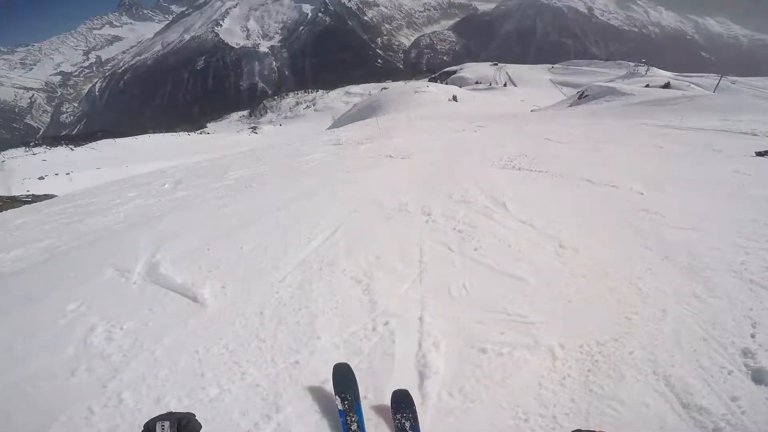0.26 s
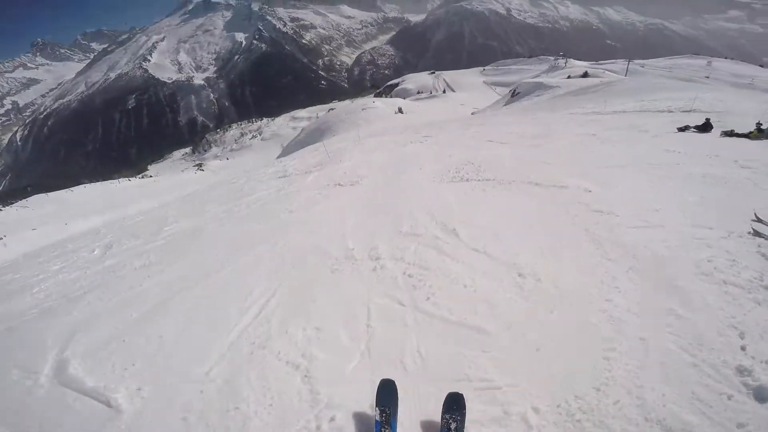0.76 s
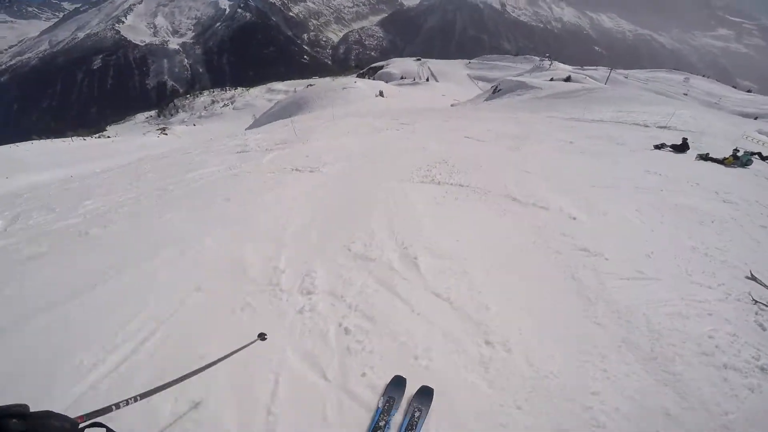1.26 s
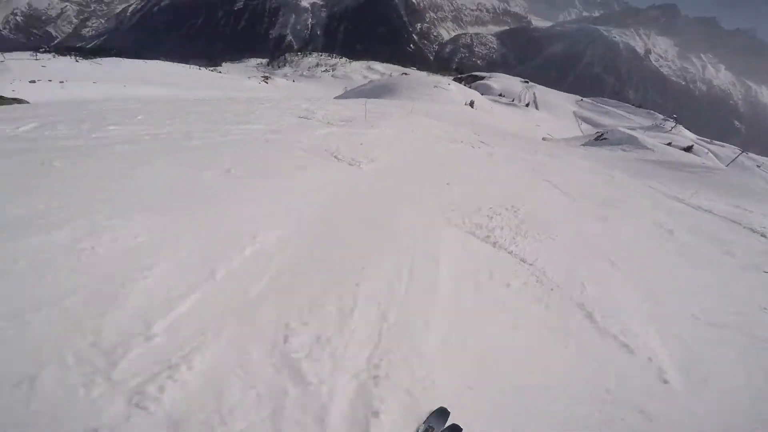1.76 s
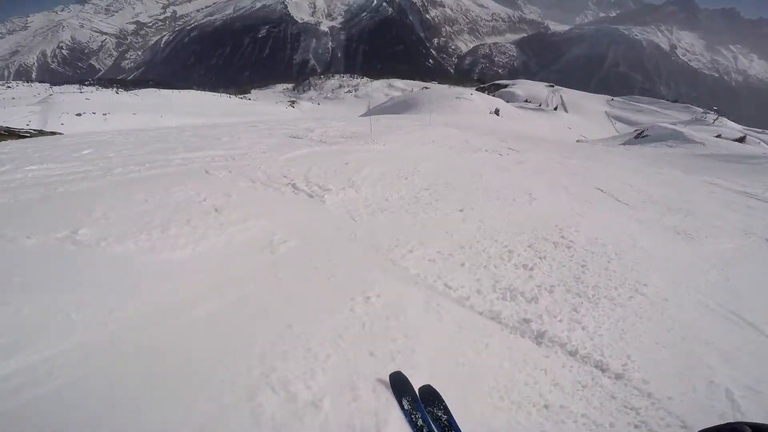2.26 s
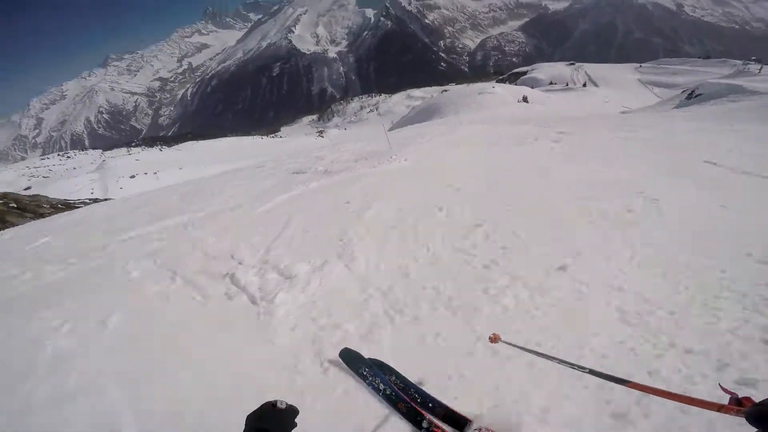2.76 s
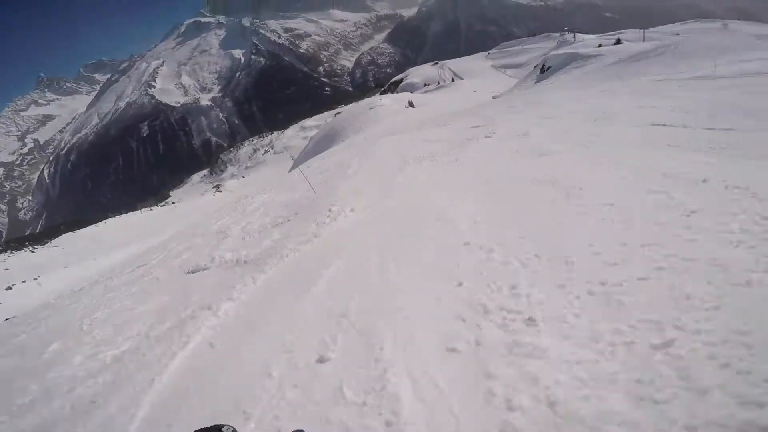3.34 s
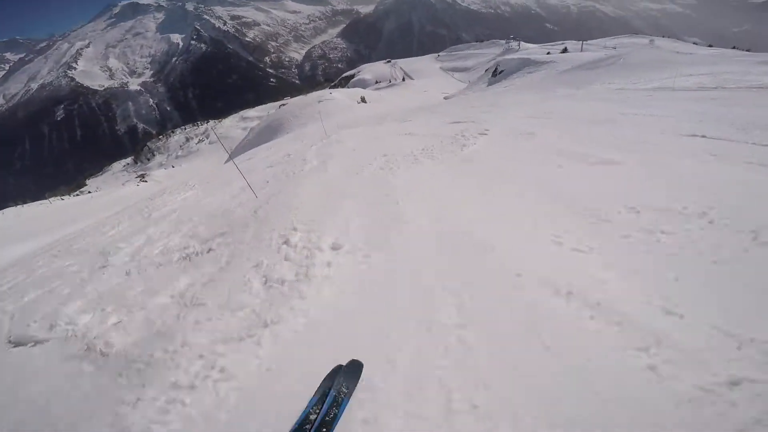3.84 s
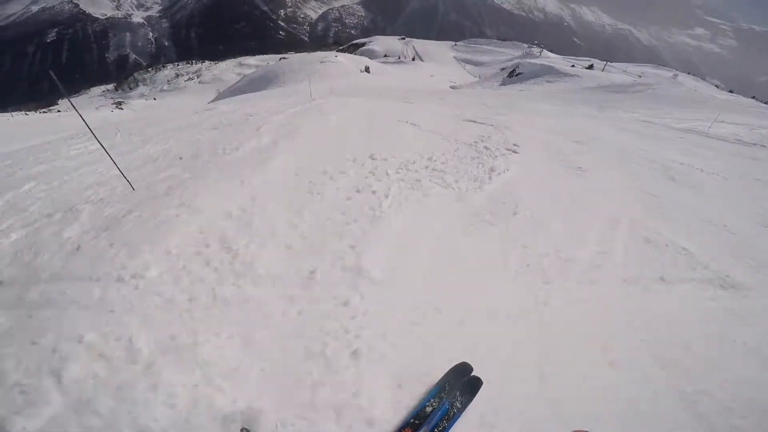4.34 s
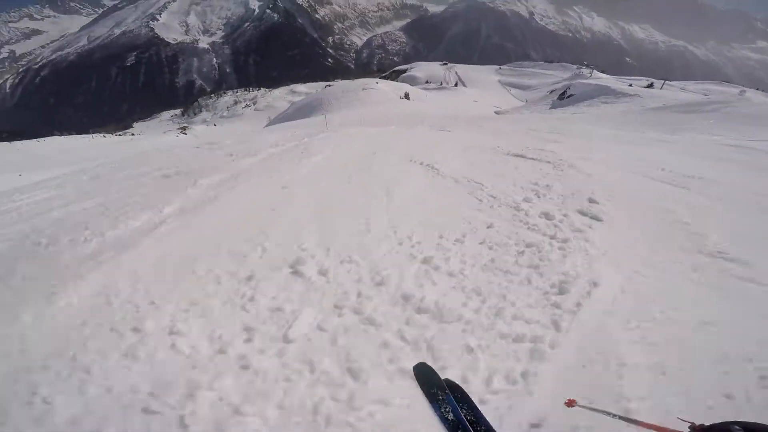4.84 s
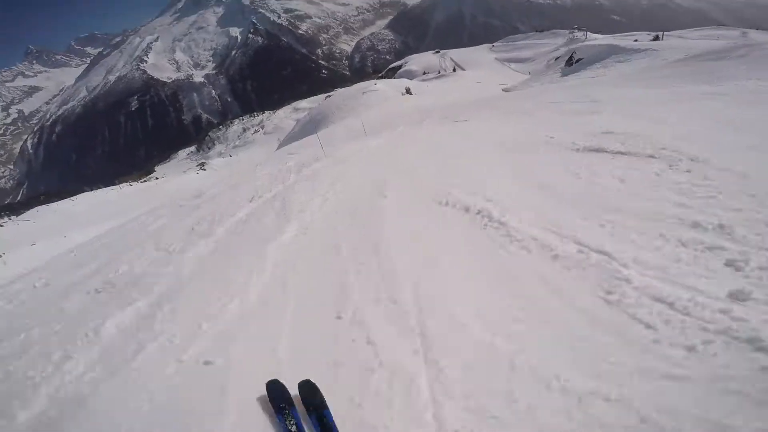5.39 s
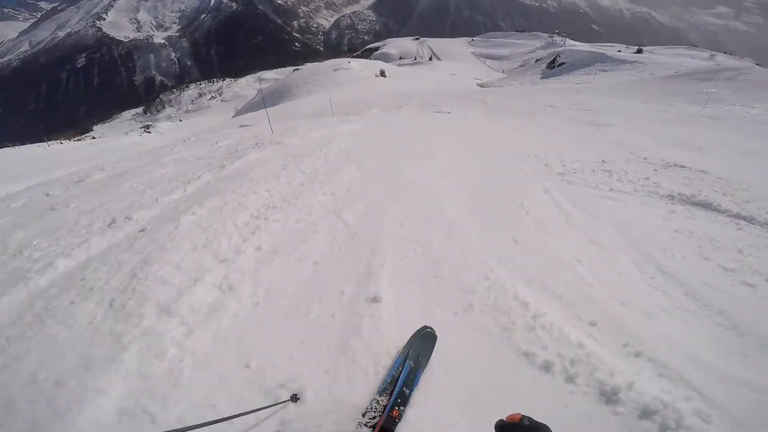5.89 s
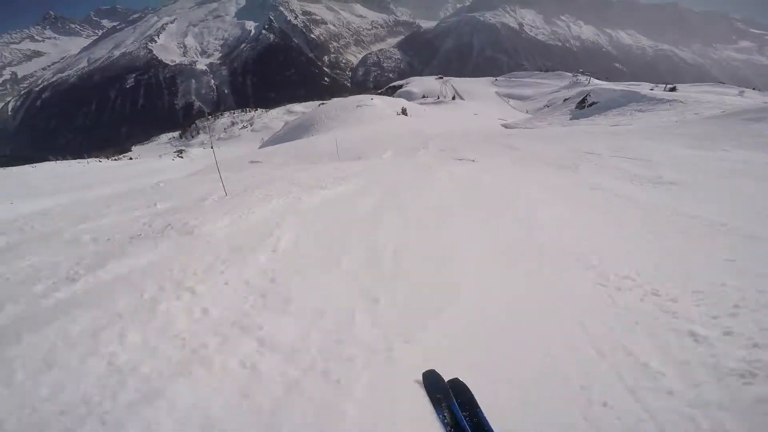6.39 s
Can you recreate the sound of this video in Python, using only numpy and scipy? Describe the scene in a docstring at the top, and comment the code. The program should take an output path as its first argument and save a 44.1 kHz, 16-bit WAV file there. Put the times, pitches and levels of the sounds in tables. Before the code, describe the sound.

From a skier's own position on an open mountain slope, a quiet glide gives way to bright, grainy hisses as the edges bite firm snow. Each turn swells, peaks and falls away, with crunching crust and low grinding. Dull boot knocks, hard little rattles and faint hollow creaks punctuate it, while wind flaps deeply against the casing. The enclosed microphone makes everything close, slightly hollow and plasticky.

```python
"""Skis hiss and crunch through linked turns in firm snow, boots creak and knock, bindings tick, wind buffets.
All is heard by a camera shut in a plastic housing. Snow is grainy noise whose level follows the bite of the edges.
Knocks are short damped pushes, ticks noise bursts, creaks resonated slips, and wind a low flap with turbulence.
Snow, knocks and ticks pass through the resonances of the housing."""
import sys
import numpy as np
from scipy import signal
from scipy.fft import rfft, irfft, next_fast_len
from scipy.io import wavfile
from scipy.ndimage import uniform_filter1d

SR = 44100
rng = np.random.default_rng(int(sys.argv[2]) if len(sys.argv) > 2 else 0)


def persist_wave(psi):
    """Save psi, clipped to +-1, as 16-bit WAV."""
    counts = np.round(np.clip(psi, -1, 1) * 32767).astype(np.int16)
    wavfile.write(sys.argv[1], SR, np.atleast_2d(counts).T)


N = 291942

# snow condition along the run, as offsets: [t/s, crust/dB, looseness/dB, coarse powder/dB]
SNOW = [(0.06, 2.5, -9.5, 0), (1.3, 3.5, -1, -2), (2.0, 1, -2, -14), (2.5, -0.5, 1.5, -14),
        (2.72, 2.5, -4.5, 2), (3.4, -7.5, 0.5, -0.5), (3.8, 4, 1, -2), (4.0, 3.5, 1.5, -7),
        (4.5, -2.5, 4, -15), (4.9, 3.5, -2, -2), (5.15, 0, 0.5, 1), (5.65, 4, -3, -5), (6.05, 0, 1, -12),
        (6.62, 2.5, -1.5, 1)]
# short scuffs over lumps of crust: [centre t/s, length/s, crunch level/dB, grind level/dB]
SCUFFS = [(0.1, 0.24, -51, -61), (0.6, 0.1, -56, -62), (1.15, 0.034, -48, -60), (1.76, .08, -39.5, -48),
          (2.65, 0.062, -52, -54.5), (2.82, 0.26, -60, -54), (3.57, 0.067, -59, -65),
          (3.74, 0.086, -49, -52.5), (3.9, 0.12, -51, -49), (4.5, 0.16, -47, -54), (4.7, 0.12, -47, -50),
          (4.86, 0.099, -55, -56), (5.08, 0.16, -44.5, -51.5), (5.15, 0.048, -33, -50.5),
          (5.73, 0.17, -62, -55), (5.95, .08, -37.5, -61), (6.35, 0.22, -41.5, -48.5),
          (6.45, 0.13, -44, -50), (6.62, 0.17, -50, -49)]


def amp(db):
    """Amplitude factor of a level in dB."""
    return 10 ** (np.asarray(db) / 20)


def evened(x):
    """Scales x to rms 1."""
    return x / np.sqrt(np.mean(x ** 2) + 1e-20)


def read(points, hz):
    """Reads a spectrum at hz, interpolating dB along log frequency."""
    f, value = np.transpose(points)
    return np.interp(np.log(hz + 1), np.log(f + 1), value)


def column(table, index):
    """One control of a table, sample by sample."""
    rows = np.array(table)
    return np.interp(np.arange(N) / SR, rows[:, 0], rows[:, index])


def colour(x, spectrum):
    """Filters x by a spectrum."""
    size = next_fast_len(len(x))
    gain = amp(read(spectrum, np.fft.rfftfreq(size, 1 / SR)))
    return irfft(rfft(x, size) * gain, size)[:len(x)]


def wander(per_s):
    """Smooth random control of rms 1 that changes about per_s times a second."""
    span = max(int(SR / per_s / 2), 1)
    once = uniform_filter1d(rng.standard_normal(N), span)
    return evened(uniform_filter1d(once, span))


def resonate(x, hz, width_hz):
    """Resonance of gain 1: shifts hz (fixed or a curve) down to zero, smooths, shifts back."""
    turn = np.exp(2j * np.pi * np.cumsum(hz * np.ones(len(x))) / SR)
    r = np.exp(-np.pi * width_hz / SR)
    return 2 * (turn * signal.lfilter([1 - r], [1, -r], x / turn)).real


def lagging(db, seconds):
    """A level that follows db late, settling with this time constant."""
    r = np.exp(-1 / (seconds * SR))
    return db[0] + signal.lfilter([1 - r], [1, -r], db - db[0])


def swells(events, index):
    """Summed power of smooth rises and falls, one per row: [centre t/s, length/s, level/dB ...]."""
    t = np.arange(N) / SR
    power = np.zeros(N)
    for row in events:
        shape = np.cos(np.pi * np.clip((t - row[0]) / row[1], -.5, .5)) ** 2
        power += (amp(row[index]) * shape) ** 2
    return power


def patchy(x, patch_db, patch_bins, patch_frames):
    """Bright and dull patches drift over time and pitch."""
    z = signal.stft(x, nperseg=256)[2]
    patches = uniform_filter1d(rng.standard_normal(z.shape), max(round(patch_bins), 1), axis=0)
    patches = evened(uniform_filter1d(patches, max(round(patch_frames), 1), axis=1))
    return signal.istft(z * amp(patch_db * patches), nperseg=256)[1][:N]


def friction(spectrum, grains_per_s, spread_db, grain_share, flicker_db, flicker_per_s):
    """Dense hiss of crystals plus separate cracking grains, with a random flicker of level."""
    struck = rng.random(N) < grains_per_s / SR
    size = amp(spread_db * np.minimum(rng.exponential(1, N), 5)) * struck
    grains = evened(size * rng.choice([-1., 1.], N))
    share = np.clip(grain_share, 0, 1)
    rub = np.sqrt(share) * grains + np.sqrt(1 - share) * rng.standard_normal(N)
    return colour(rub * amp(flicker_db * wander(flicker_per_s)), spectrum)


def heard(x, shell, lo_hz, hi_hz):
    """A sound inside the shell, at rms 1 in the band lo_hz to hi_hz."""
    x = signal.oaconvolve(x, shell)[:N]
    hz, power = signal.welch(x, SR, nperseg=1024)
    band = (hz > lo_hz) & (hz < hi_hz)
    return x / np.sqrt(power[band].sum() * hz[1])


def skis(shell, air):
    """Four sizes of snow sound follow edge pressure; all but the grind share a chatter. The mount shakes too."""
    chatter = wander(45)
    spray_db = edges_db()
    press_db = spray_db + 45  # above the reference spray level of -45 dB
    snow = spray(shell, chatter, spray_db) + crunch(shell, chatter, press_db)
    snow += grind(shell, press_db) + powder(shell, chatter, press_db)
    return snow + mount_shake(press_db, air)


def edges_db():
    """Spray level: the flat glide plus every bite, which takes hold, builds, holds and lets go."""
    # spray of skis running flat: [t/s, level/dB]
    glide = [(0.06, -62), (0.21, -70), (0.53, -67.5), (0.62, -62.5), (1.44, -61), (1.52, -54.5), (2.4, -52),
             (2.6, -55.5), (2.72, -58.5), (2.8, -54), (3.63, -47.5), (3.98, -57.5), (5.45, -55),
             (5.65, -58.5), (6.3, -60), (6.62, -51.5)]
    # edge bites: [set t/s, peak t/s, held/s, spray level/dB, rise/(dB/s), fall/(dB/s)]
    bites = [(0.783, 0.802, 0.012, -60, 100., 131), (1.097, 1.124, 0.018, -60, 100., 100.),
             (1.446, 1.972, 0.014, -34, 43, 123), (2.044, 2.178, 0.033, -37.5, 79, 144),
             (3.1, 3.405, .17, -42, 78, 198), (3.99, 4.388, 0.025, -43, 29.5, 33),
             (4.94, 5.172, 0.038, -40.5, 71, 94), (5.67, 5.938, 0.027, -38, 75, 98),
             (5.988, 6.091, .03, -38, 105, 84)]
    set_s = 0.049  # ramp of the edge taking hold
    t = np.arange(N) / SR
    power = amp(column(glide, index=1)) ** 2
    for start_s, peak_s, held_s, db, rise, fall in bites:
        grip = np.clip((t - start_s) / set_s, 0, 1)
        build_db = rise * np.maximum(peak_s - t, 0)
        release_db = fall * np.maximum(t - peak_s - held_s, 0)
        power = power + (grip * amp(db - build_db - release_db)) ** 2
    return 10 * np.log10(power)


def spray(shell, chatter, spray_db):
    """Snow sprays off the edges: bright, dense grain noise."""
    # colour of spray: [f/Hz, gain/dB]
    spectrum = [(300, -24), (1000, -4.5), (3000, -2.5), (5000, 0), (7500, 2), (10000, -15.5), (15000, -15)]
    rub = friction(spectrum, grains_per_s=1500., spread_db=2.7, grain_share=0.22,
                   flicker_db=0.067, flicker_per_s=77.0)
    rub = patchy(rub, patch_db=1.0, patch_bins=4., patch_frames=12.) * amp(0.98 * chatter)
    return heard(rub, shell, 3600, 7500) * amp(spray_db)


def crunch(shell, chatter, press_db):
    """Crust breaks under the edges and in scuffs: sparser mid-pitched grains."""
    # colour of breaking crust: [f/Hz, gain/dB]
    spectrum = [(300, -60), (900, -7.5), (1500, 4.5), (2600, 5), (4000, -15.5), (8000, -73), (15000, -37)]
    rub = friction(spectrum, grains_per_s=700., spread_db=2.6, grain_share=0.19,
                   flicker_db=0.26, flicker_per_s=55.0)
    rub = patchy(rub, patch_db=1.7, patch_bins=3., patch_frames=5.) * amp(1.3 * chatter)
    pressed_db = -46. + 1.1 * press_db + column(SNOW, index=1)
    level = np.sqrt(amp(pressed_db) ** 2 + swells(SCUFFS, index=2))
    return heard(rub, shell, 1250, 3000) * level


def grind(shell, press_db):
    """Low, patchy grinding under the edges and in scuffs."""
    # colour of grinding: [f/Hz, gain/dB]
    spectrum = [(60, 7), (150, -6.5), (400, 0.5), (800, -1.5), (1300, -4), (3000, -13)]
    rub = friction(spectrum, grains_per_s=300., spread_db=1.7, grain_share=0.15,
                   flicker_db=2.73, flicker_per_s=31.0)
    rub = patchy(rub, patch_db=3.4, patch_bins=1.5, patch_frames=8.)
    pressed_db = -56. + 0.68 * press_db
    level = np.sqrt(amp(pressed_db) ** 2 + swells(SCUFFS, index=3))
    return heard(rub, shell, 200, 900) * level


def powder(shell, chatter, press_db):
    """Fine hiss of powder that hangs in the air, so its level lags the pressure; a coarser band varies."""
    # colour of fine powder: [f/Hz, gain/dB]
    fine = [(4000, -25), (8000, -5), (11800, -9.5), (12800, -3), (15000, 1.5)]
    # band of coarse powder: [f/Hz, gain/dB]
    coarse = [(8000, -40), (9300, 2.5), (11300, 5.5), (12300, -35)]
    hang_s = 0.044
    rub = friction(fine, grains_per_s=4000., spread_db=5.7, grain_share=0.2,
                   flicker_db=0.52, flicker_per_s=40.) * amp(0.43 * chatter)
    level_db = -57. + 0.7 * lagging(press_db, hang_s) + column(SNOW, index=2)
    hiss = heard(rub, shell, 11500, 15000) * amp(level_db)
    return hiss + colour(hiss, coarse) * amp(column(SNOW, index=3))


def mount_shake(press_db, air):
    """Edge pressure and gusts shake the mount: unsteady low rumble, not passed through the shell."""
    # colour of the shake: [f/Hz, gain/dB]
    spectrum = [(25, -23), (50, 7.5), (80, -7), (150, -20.5), (300, -34), (800, -43)]
    shake = evened(colour(rng.standard_normal(N) * amp(2.5 * wander(14)), spectrum))
    return shake * amp(-39.5 + 0.47 * press_db) * air ** 0.33


def add(out, s, db, sound, shell):
    """Adds one event rung through the shell, with peak level db, starting at s."""
    rung = signal.fftconvolve(sound, shell)
    part = out[round(s * SR):][:len(rung)]
    part += amp(db) * rung[:len(part)] / abs(rung).max()


def knocks(shell):
    """Dull blows: each is a push of a few cycles with a crumbly tail."""
    # blows: [t/s, peak level/dB, centre f/Hz, length/cycles]
    blows = [(.424, -48, 1840, 4.3), (.535, -48, 1090, 4.7), (.582, -38, 1520, 1.5),
             (1.091, -30.5, 1430, 4), (1.149, -28, 1530, 6.5), (1.2, -39.5, 1580, 5.1),
             (1.353, -36, 1030, 1.7), (1.503, -30, 1920, 8.5), (2.625, -38, 576, 2.1),
             (2.643, -33, 1300, 3.3), (2.649, -29, 536, 1.4), (2.795, -44, 455, 6), (2.834, -35, 1950, 5.6),
             (3.821, -35, 1960, 5.4), (3.886, -39, 630, 5.2), (3.907, -35.5, 840, 5),
             (4.139, -27, 1090, 2.3), (4.459, -34, 260, 1.3), (4.689, -26, 1920, 0.99),
             (4.875, -35, 620, 2.4), (4.882, -23, 1120, 2.1), (5.3, -31, 1560, 1.9),
             (5.354, -36, 1180, 3.3), (5.406, -28.5, 1850, 1.3), (5.476, -37, 1500, 3.3),
             (5.506, -35, 1900, 6), (5.712, -22.5, 1510, 1.5), (6.298, -26, 1700, 0.94),
             (6.342, -33, 1850, 6.2), (6.355, -26.5, 1600, 3.8), (6.357, -29.5, 660, 3.6),
             (6.369, -22, 1650, 1.5), (6.427, -22.5, 630, 3.3), (6.44, -26, 1840, 2.6),
             (6.474, -27, 564, 3.3)]
    out, t = np.zeros(N), np.arange(1500) / SR
    for (s, db, hz, cycles), grit in zip(blows, rng.standard_normal((len(blows), len(t)))):
        u = t * hz / max(cycles, .5) * 4  # the push peaks at u = 1
        push = u * np.exp(1 - u) * np.sin(2 * np.pi * hz * t)
        tail = evened(resonate(grit, hz, hz / 2)) * amp(-14.0 - t * 1600.0) * np.minimum(u, 1)
        add(out, s, db, push + tail, shell)
    return out


def ticks(shell):
    """Hard parts rattle: a sharp burst of noise round a centre pitch."""
    # rattles: [t/s, peak level/dB, centre f/Hz]
    rattles = [(0.651, -41, 3230), (0.821, -35, 4300), (1.1474, -32, 2700), (1.1707, -36, 3280),
               (1.504, -26.5, 3100), (2.6443, -29, 3300), (2.834, -32, 3200), (3.0125, -31, 4200),
               (3.574, -21, 4250), (3.8195, -26, 3020), (4.136, -29, 5630), (4.691, -36, 3060),
               (5.3537, -24, 2700), (5.3767, -37, 5520), (5.4038, -30.5, 3120), (5.473, -34, 2630),
               (5.5068, -31.5, 2520), (6.2973, -26, 2610), (6.3679, -33, 2720)]
    t60_s = 0.03
    out, t = np.zeros(N), np.arange(1500) / SR
    snap = 1 + 3.1 * np.exp(-t / 0.00046)  # crisp onset
    decay = np.exp(-np.log(1000) * t / t60_s)
    for (s, db, hz), grit in zip(rattles, rng.standard_normal((len(rattles), len(t)))):
        core = resonate(resonate(grit, hz, 1500.0), hz, 1500.0)
        burst = core + 0.36 * resonate(grit, hz, 4700.0)
        add(out, s, db, burst * snap * decay, shell)
    return out


def creaks():
    """Uneven slips in a flexing boot ring a hollow, gliding note and, weaker, its third partial."""
    # creaks: [start t/s, length/s, initial note level/dB, first f/Hz, last f/Hz]
    flexes = [(1.919, .11, -44, 600, 620), (2.128, 0.16, -52, 594, 560), (2.773, 0.074, -52.5, 634, 634),
              (4.703, 0.096, -50, 664, 625), (4.799, 0.082, -48.5, 610, 614), (5.044, .06, -50, 700, 694),
              (6.436, .085, -46, 644, 610)]
    fade_db = -4  # change over each creak
    out = np.zeros(N)
    for s, length_s, db, first_hz, last_hz in flexes:
        u = np.arange(0, 1, 1 / (length_s * SR))
        hz = first_hz + (last_hz - first_hz) * u
        slips = rng.standard_normal((2, SR // 4))[:, :len(u)]
        note = evened(resonate(resonate(slips[0], hz, 120.0), hz, 120.0))
        third = evened(resonate(resonate(slips[1], 3 * hz, 190.0), 3 * hz, 190.0))
        level = amp(db + fade_db * u) * signal.windows.tukey(len(u), .3)
        at = round(s * SR)
        out[at:at + len(u)] += level * (note + amp(-1.5) * third)
    return out


def housing():
    """Causal (minimum-phase) response of the shell: resonances over what leaks through the wall."""
    # wall leakage: [f/Hz, gain/dB]
    leakage = [(100, -2), (400, -9.5), (1300, -11), (3000, -7.5), (6500, -11.5), (8000, -18), (15000, -24)]
    # shell resonances: [f/Hz, width/Hz, gain/dB]
    modes = [(620, 190, -7.5), (990, 340, -7.5), (1512, 505, -4.5), (1798, 340, -3.5), (2414, 100, -7.5),
             (2657, 186, -1.5), (3127, 240, -3), (3540, 310, -9.5), (4063, 390, -2), (4380, 106, -1.5),
             (4713, 96, -3), (5523, 480, -4), (6614, 460, -7.5), (8616, 326, -3.5), (10100, 390, -19),
             (11950, 940, -15), (12970, 1120, -14)]
    # cancellation between neighbouring modes: [f/Hz, width/Hz, gain/dB]
    dips = [(2090, 210, -4), (2904, 190, -3.5), (3660, 90, -3.5), (8600, 415, -16.5)]
    hz = abs(np.fft.fftfreq(8192, 1 / SR))
    power = amp(read(leakage, hz)) ** 2
    for f, width, db in modes:
        power = power + amp(db) ** 2 / (1 + (2 * (hz - f) / width) ** 2) ** 2
    for f, width, db in dips:
        power = power * amp(db / (1 + (2 * (hz - f) / width) ** 2)) ** 2
    log_response = np.conj(signal.hilbert(np.log(power) / 2))
    return np.fft.ifft(np.exp(log_response)).real[:2048]


def airstream():
    """Strength of the wind: a wavering stream with single gusts on top."""
    # stream strength: [t/s, level/dB]
    stream_points = [(0.06, -28.5), (0.5, -39), (0.85, -23.5), (1.08, -29), (1.43, -36), (1.66, -19.5),
                     (2.32, -19.5), (2.63, -33.5), (2.72, -26), (3.12, -18), (3.24, -33), (3.87, -30),
                     (4.05, -25.5), (4.75, -28), (5.0, -24), (5.13, -27), (5.8, -31), (6.1, -24),
                     (6.44, -33.5), (6.62, -39)]
    # gusts that slap the shell: [peak t/s, length/s, level/dB]
    buffets = [(0.03, 0.18, -12), (0.67, 0.18, -20), (1.17, 0.13, -20.5), (1.32, 0.25, -21.5),
               (1.55, 0.16, -16), (2.85, 0.088, -9.5), (3.4, 0.33, -19.5), (3.6, .08, -22),
               (3.77, 0.16, -18), (4.4, 0.069, -16), (5.34, 0.21, -16.5), (5.62, 0.34, -29),
               (6.2, 0.083, -9), (6.57, 0.15, -21.5)]
    stream = amp(column(stream_points, index=1) + 4 * wander(7.2))
    return np.sqrt(stream ** 2 + swells(buffets, index=2))


def wind(air):
    """Eddies flap the shell at an unsteady low rate, over a lumpy turbulent skirt."""
    # colour of turbulence: [f/Hz, gain/dB]
    spectrum = [(15, -1), (25, 12), (40, -10), (60, -18.5), (100, -41.5), (200, -50.5), (400, -53.5),
                (1000, -77)]
    flap_hz = 24. * (1 + 0.209 * wander(12.5))
    turns = np.cumsum(flap_hz) / SR
    flap = np.sqrt(2) * np.sin(2 * np.pi * turns) * amp(0.34 * wander(8.4))
    lumps = evened(colour(rng.standard_normal(N), spectrum))
    return air * (amp(-0.5) * flap + amp(-2.5) * lumps)


def scene():
    """Skis, boots, bindings and wind, in one channel."""
    shell, air = housing(), airstream()
    return (skis(shell, air) + knocks(shell) + ticks(shell) + creaks() + wind(air))[None]


def record(dry):
    """Microphone hiss and a thin wavering whine of the circuits, then the band limit."""
    # colour of the hiss: [f/Hz, gain/dB]
    spectrum = [(100, 17), (1000, 8), (5000, -13), (9000, -3), (15000, -28)]
    whine_hz, whine_db, edge_hz = 10055, -82, 15250
    hiss = amp(-64.5) * evened(colour(rng.standard_normal(N), spectrum))
    whine = amp(whine_db) * evened(resonate(rng.standard_normal(N), whine_hz, 25.))
    lowpass = signal.firwin(767, edge_hz, window=("kaiser", 10), fs=SR)
    return signal.oaconvolve(dry + hiss + whine, lowpass[None], "same")


dry = scene()
out = record(dry)
persist_wave(out)
```